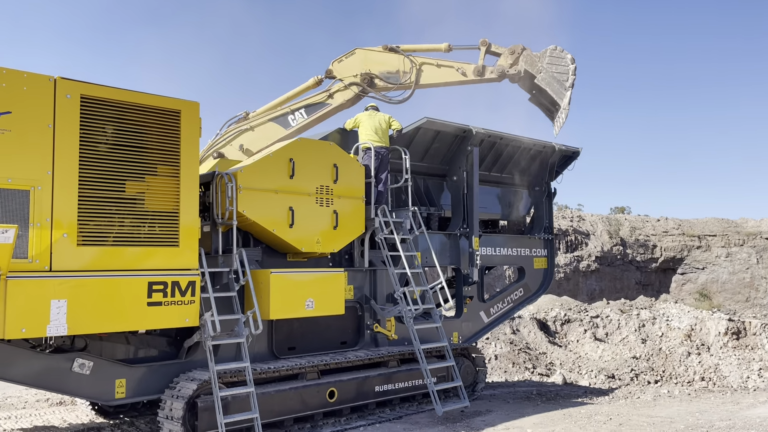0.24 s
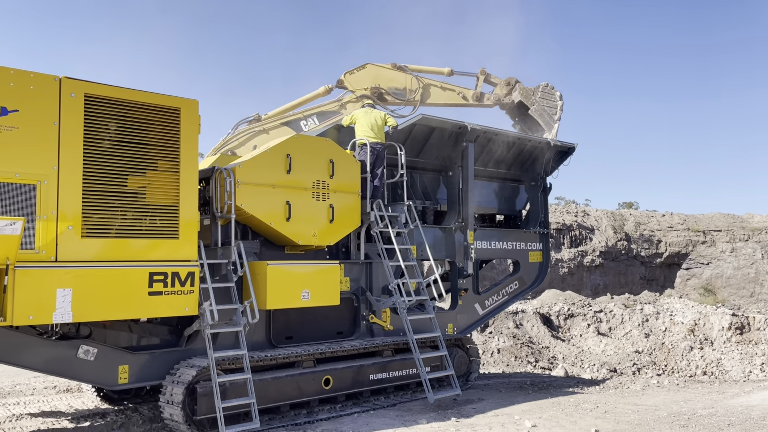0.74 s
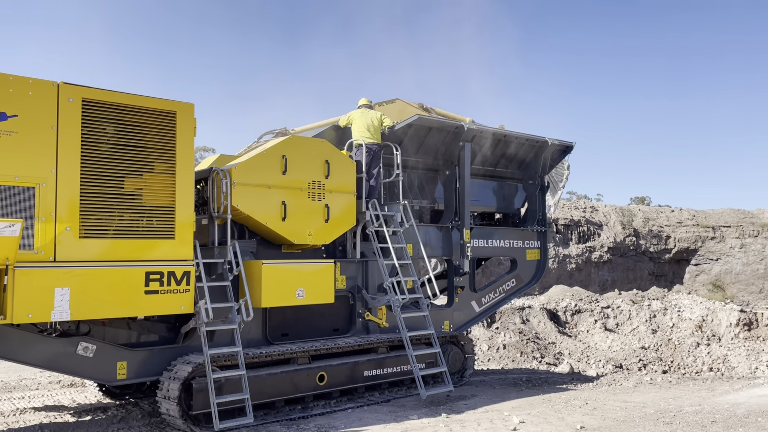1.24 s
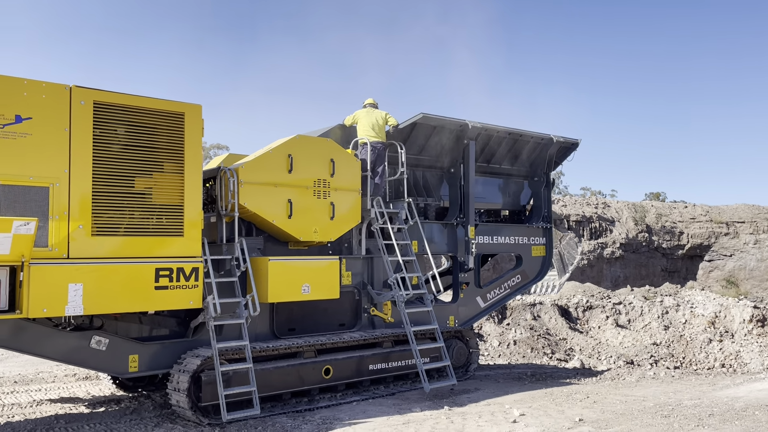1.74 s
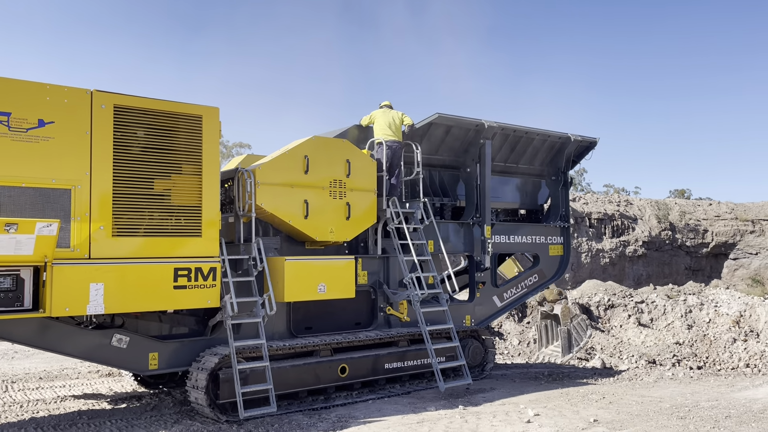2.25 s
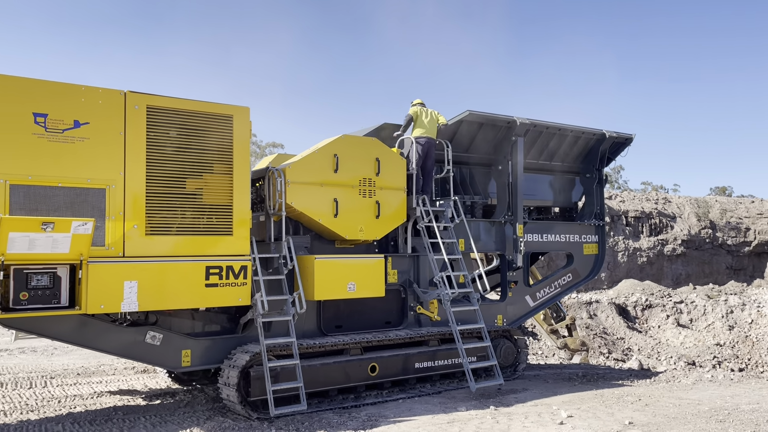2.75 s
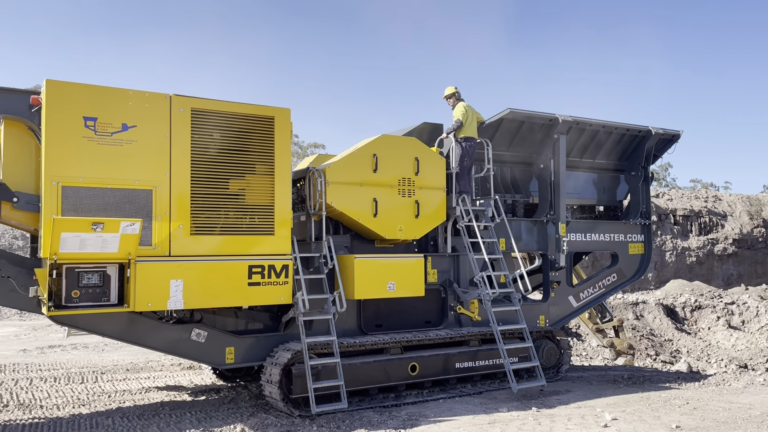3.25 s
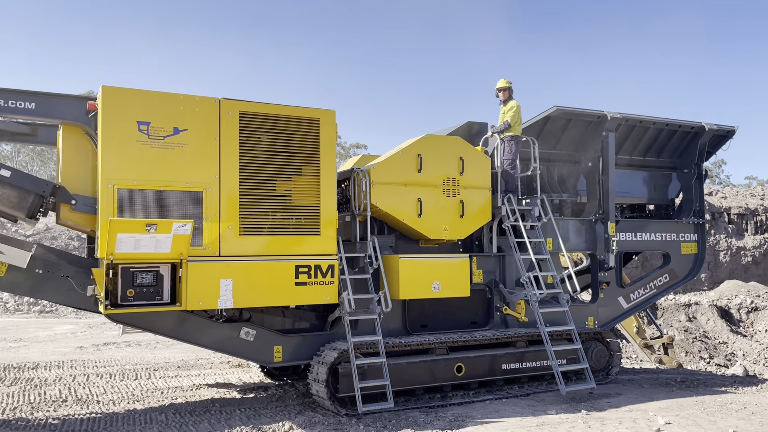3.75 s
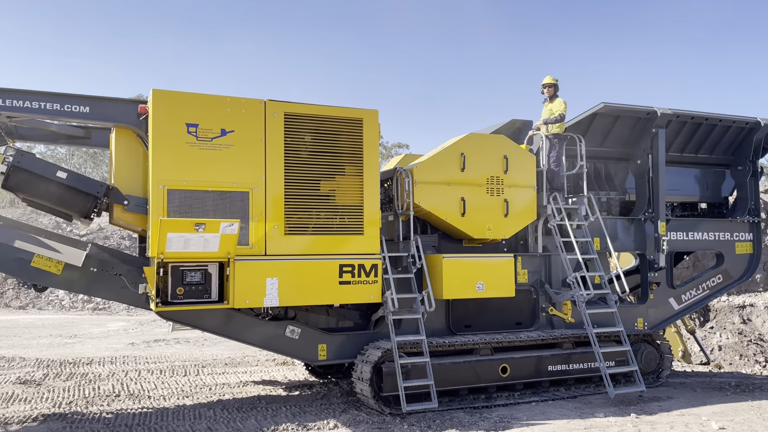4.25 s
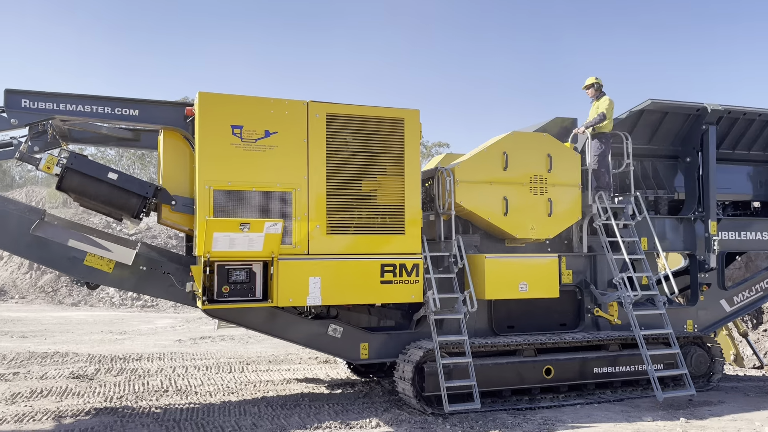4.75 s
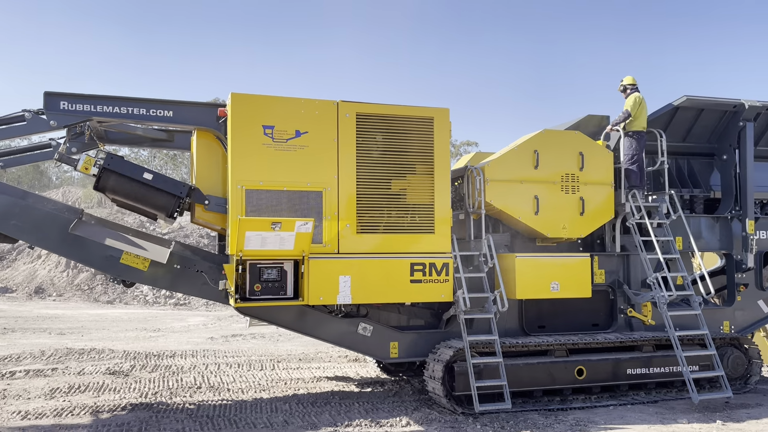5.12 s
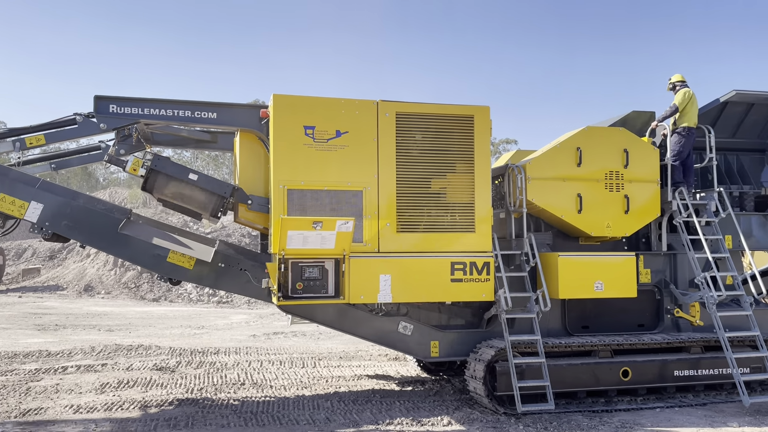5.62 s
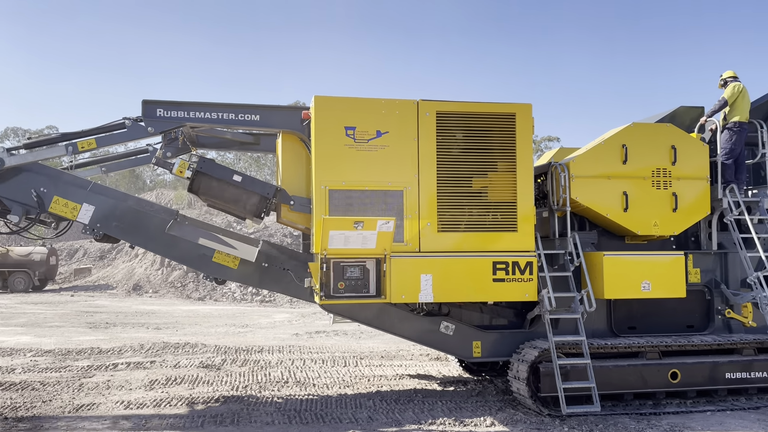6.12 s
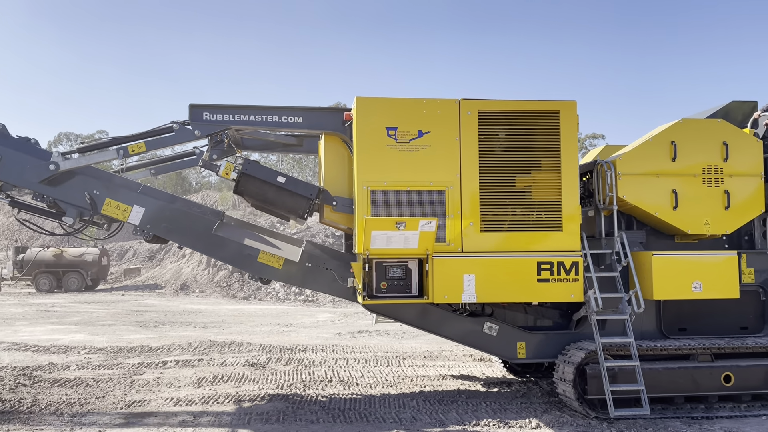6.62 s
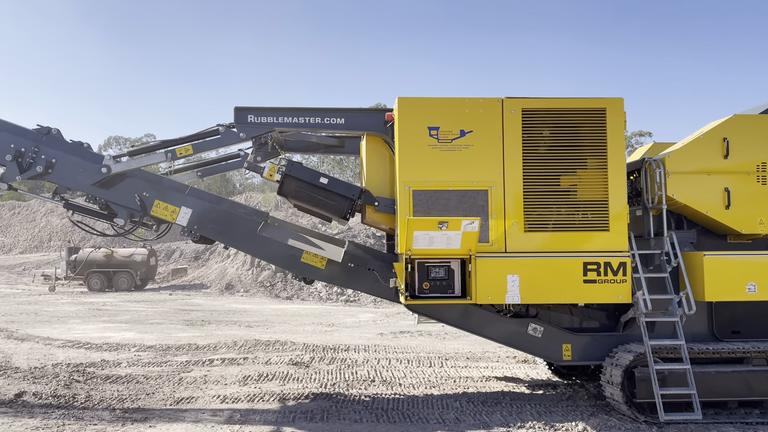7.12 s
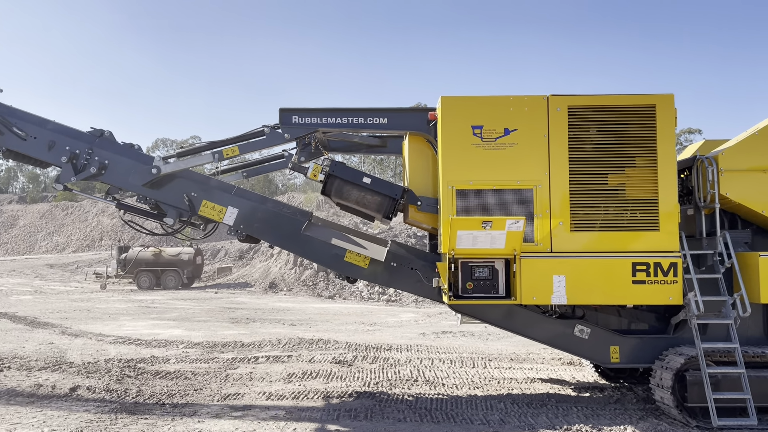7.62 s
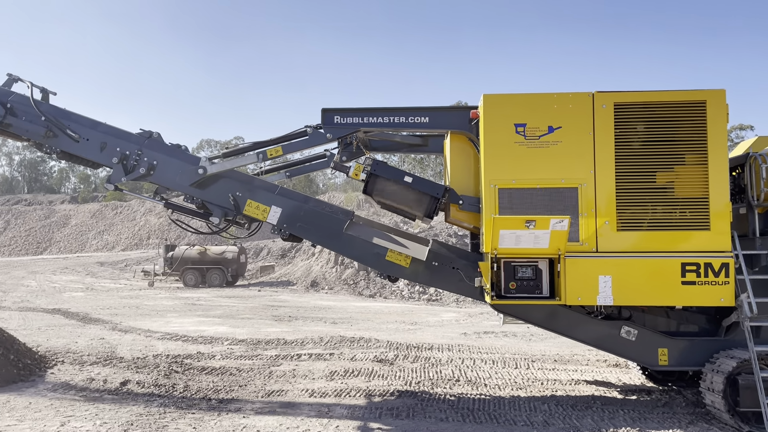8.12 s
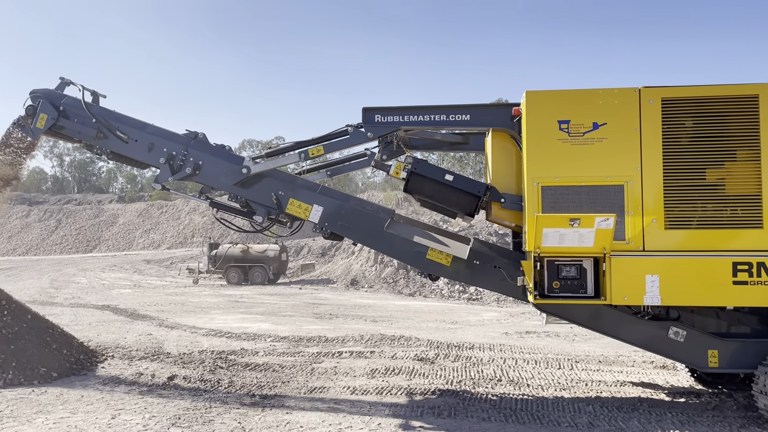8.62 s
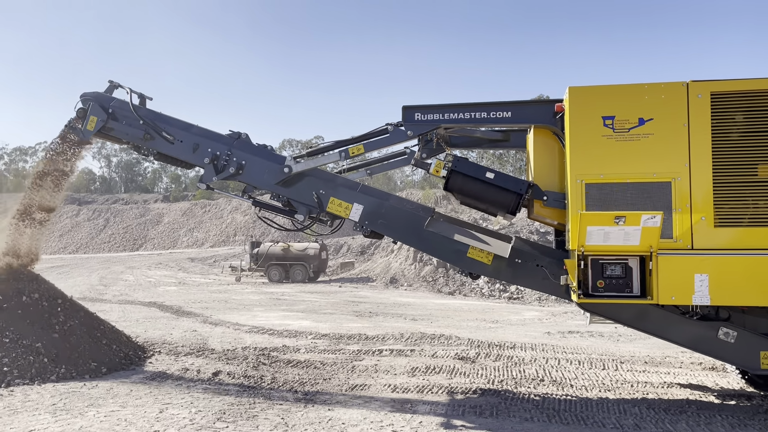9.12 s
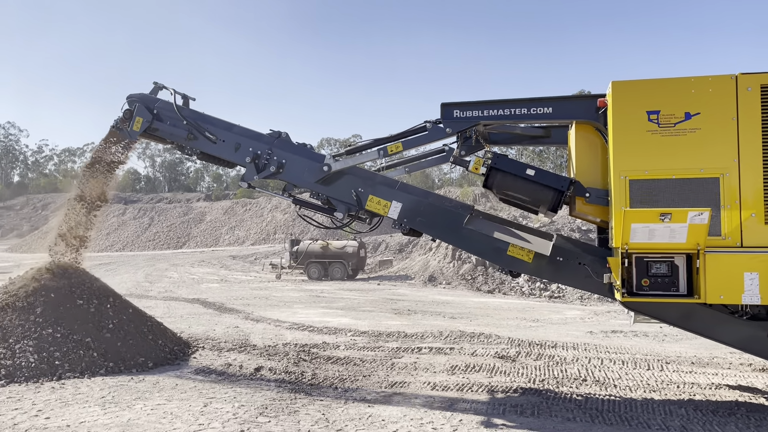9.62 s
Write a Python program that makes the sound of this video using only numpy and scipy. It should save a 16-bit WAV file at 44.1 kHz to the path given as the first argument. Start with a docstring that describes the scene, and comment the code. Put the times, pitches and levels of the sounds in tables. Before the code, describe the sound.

A tracked rock crusher grinds loudly outdoors, engine droning and gears whining while stones clatter through steel and gritty rubble hisses along a conveyor.

```python
"""A tracked jaw crusher works in a quarry, heard from a few metres; its lowest bass fills in over the first seconds.
From the start a six-cylinder diesel drones as pulse harmonics, its fan hums, filtered noise clatters and blows
through louvres, gears whine as tones geared to the engine, modes thump with the jaw, and random impacts make
stone rattle through the chamber and along the belt; cracks ring. Near 1.9 s a dumped bucketful booms as decaying
low noise, and near 3.6 s a stone squeals in bending tones, while the microphone turns from hopper to conveyor."""
import sys
import numpy as np
from scipy import signal
from scipy.fft import rfft, irfft
from scipy.io import wavfile
from scipy.ndimage import uniform_filter1d, map_coordinates

SR = 44100
rng = np.random.default_rng(int(sys.argv[2]) if len(sys.argv) > 2 else 0)


def to_wav(s):
    """Save 16-bit WAV."""
    ch = np.atleast_2d(s).T  # columns
    pcm = np.round(np.clip(ch, -1, 1) * 32767)  # PCM
    wavfile.write(sys.argv[1], SR, pcm.astype(np.int16))


N = 434826
TIME = np.arange(N) / SR  # s

# Swing of the microphone along the machine: t/s, turn (0 hopper, 1 end of the conveyor)
TURN = [(0, 0.079), (1.9, 0.063), (3, 0.12), (3.7, 0.21), (4.3, 0.28), (6, 0.56), (7.1, 0.7), (8.5, 0.88),
        (9.86, 0.99)]
# Engine speed, the governor hunting as the jaw fills, then settling: t/s, f/Hz (four-stroke cycles)
SPEED = [(0, 15.79), (.35, 15.77), (1, 15.84), (1.4, 15.885), (2, 15.79), (2.45, 15.742), (3, 15.845),
         (3.5, 15.893), (4, 15.845), (4.4, 15.795), (5.2, 15.863), (5.75, 15.877), (6.4, 15.818),
         (7.5, 15.83), (8.4, 15.85), (9.86, 15.828)]
NOMINAL_CYCLE_HZ, JAW_HZ, FIRST_BITE_S = 15.83, 4.707, .083
FAN_RATIO = 15.9  # blade passages per engine cycle

# Exhaust drone: multiple of the four-stroke cycle, relative level/dB
EXHAUST = [(6, -1), (9, -15.5), (10, -10), (12, -6), (18, -13), (20, -18.5), (21, -23.5), (24, -18.5),
           (26, -23), (28, -26), (30, -23), (38, -21.5), (39, -27), (40, -20.5)]
# Exhaust overtone that swells with engine speed: level at the slowest, gain at the fastest
HOWL_MULTIPLE, HOWL_DB, HOWL_SURGE_DB = 36, -43, 11

# Fan hum: multiple of the blade rate, level/dB
FAN = [(1, -24), (2, -33), (3, -38.5), (4, -38.5), (5, -44.5), (6, -45), (8, -48)]
OVERTONE_LOSS_DB = 3  # what the fan overtones lose behind the housing
# Noise through the louvres: f/Hz, spectral level/dB per Hz
LOUVRE = [(500, -23), (900, -3.5), (1150, 2.5), (1370, -1.5), (1600, 0), (1900, -2), (2350, -4.5),
          (2800, -8.5), (3400, -14), (5500, -51)]
LOUVRE_TURN, LOUVRE_SPAN = 0.74, 0.52  # the louvres throw their sound in a beam of their own
AIR_DB, BEAM_DB = -31.5, 7.5  # louvre air outside the beam, and its gain inside

# Gear and pump whines: multiples of the engine cycle
WHINE_MULTIPLES = [41.76, 42, 55, 59, 75, 79, 87, 96, 102, 108, 133, 141, 144, 160, 167, 180, 198, 252, 288,
                   320, 324]
# Their levels beside the louvre beam: level/dB
WHINE_ASIDE_DB = [-39, -38, -39.5, -43.5, -47, -47, -48, -52, -53, -52, -58, -49.5, -48, -50.5, -53, -56,
                  -52, -64, -56, -52.5, -52]
# Their levels in the louvre beam: level/dB
WHINE_BEAM_DB = [-38.5, -35.5, -41, -42, -39.5, -46, -47, -45, -47, -40, -45, -51, -55, -52, -51, -47.5,
                 -68, -59, -58, -60, -55]

# Frame modes that swell once with each jaw stroke: f/Hz, relative level/dB
FRAME = [(51.5, -11.5), (72.8, 2.5), (104, -3)]
# How hard the jaw bites: t/s, thump level/dB
BITE = [(0, -24), (2.6, -27), (3.3, -26), (4.7, -25), (5.7, -32), (7, -32), (8.4, -23), (9.86, -26)]
THUMP_SHARPNESS = 3.8  # higher makes each thump shorter
# Heavy rumble under the jaw: f/Hz, spectral level/dB per Hz
RUMBLE = [(20, -33), (35, -25), (50, -4.5), (80, 2), (105, -4.5), (135, -6.5), (230, -5), (290, -6.5),
          (340, -17.5), (600, -38)]

# Stone rattling in the chamber: f/Hz, spectral level/dB per Hz
STONE = [(150, -24), (290, -18), (350, -1.5), (420, -5), (510, 1), (640, 0.5), (740, -5), (860, -1),
         (1020, -2), (1300, -8.5), (1900, -13), (2600, -21.5), (4000, -30.5)]
# Grit on the belt: f/Hz, spectral level/dB per Hz
GRIT = [(1800, -23), (2600, -4.5), (3300, 3), (3900, 5), (4600, 1.5), (5200, 0), (5650, -7), (6500, -3.5),
        (8000, -15)]
# Dust on the belt: f/Hz, spectral level/dB per Hz
DUST = [(3500, -18), (5800, -4), (6500, -1.5), (8000, -3), (9500, .3), (10500, 2.6), (11300, 0),
        (12200, -1), (13000, -4), (14000, -9), (15200, -14.5)]
SCREEN_TURN, SCREEN_SPAN = 0.69, 0.081  # around this turn the housing comes to hide the crushing chamber
STONE_DB, STONE_LOSS_DB = -23.5, 1  # in plain view, and what is lost when hidden
GRIT_DB, GRIT_LOSS_DB = -35.5, 1.5

# Loose stones that knock on the chute, each with its own pitch
KNOCKS_PER_S, KNOCK_LOW_HZ, KNOCK_HIGH_HZ, KNOCK_T60_S = 30, 400, 2200, .04
KNOCK_DB, KNOCK_SPREAD_DB = -26, 3

# Lumps on the conveyor: f/Hz, spectral level/dB per Hz
BELT = [(450, 2.5), (800, -4), (1300, -2.5), (1900, -4), (2600, -7), (4000, -32)]
LUMPS_PER_S, LUMP_RING_S = 70, .007
BELT_DB, BELT_AWAY_DB = -34, 2  # when facing the conveyor end, and the loss at the hopper

# Larger rocks cracking in the jaw: t/s, peak level/dB
CRACKS = [(0.076, -9.5), (1.388, -12.5), (1.986, -15), (2.124, -17), (2.371, -14), (3.301, -18),
          (3.86, -17), (4.808, -15), (8.291, -16)]
# Modes of the steel chamber: f/Hz, relative level/dB, t60/s
CHAMBER = [(410, -4, 0.093), (495, -5, 0.15), (567, -6, 0.13), (694, -1, 0.12), (906, -3, 0.064),
           (1030, -6, 0.047), (1220, -4, .05), (1570, -10, .04), (2530, -14, .03)]

# A bucketful of rock lands and the hopper booms
DUMP_S, DUMP_ATTACK_S, DUMP_DECAY_S, DUMP_DB = 1.87, .06, 0.51, -23
# Its boom: f/Hz, spectral level/dB per Hz
HOPPER = [(50, -28), (72, -6), (88, 2), (103, -12), (150, -17), (220, -36)]

# Short slips of a stone on steel: t/s, length/s, f/Hz, glide/(Hz per s), level/dB
SLIPS = [(3.56, 0.043, 2530, 1400, -34), (3.59, .044, 2590, -1000, -32), (3.622, .056, 2690, -3200, -30.5),
         (3.68, .045, 2560, -200, -37)]
SLIP_EDGE_S = .018  # attack and release
# Modes of the squealing plate: ratio to the slip frequency, relative level/dB
SQUEAL_MODES = [(0.99, 3), (.93, -9), (.68, -7)]

# Phase between the ports at any angle: f/Hz, left lead/rad
PORTS = [(260, -.38), (850, .8), (1300, .9), (2240, .55), (3400, .9), (5250, .8), (5680, -1.1),
         (6800, -1.25), (7600, -2.8), (10000, -4.05), (12900, -6.2)]
# Left minus right at any angle: f/Hz, width/octaves, level/dB
BALANCE_BANDS = [(524, 1, -3), (3250, 0.21, 5), (5940, 0.063, -3), (7330, 0.046, 12.5)]
# Two dips at the right port that slide with the turn:
# turn, lower f/Hz, its strength (1 cancels fully), upper f/Hz, its strength
DIPS = [(.06, 2040, 1.57, 3830, 0.83), (.14, 2350, 1.47, 4130, 1), (.24, 2850, 0.93, 5270, 0.81),
        (.4, 3300, 0.81, 6100, 0.067), (.66, 3700, .25, 6800, .05), (.87, 3650, 0.081, 5300, 0.77),
        (1, 3200, 0.83, 3900, 0.39)]
LOW_DIP_Q, HIGH_DIP_Q = 2.2, 6.1
# Shading of the ports that grows with the turn: f/Hz, width/octaves, left level/dB, right level/dB (full turn)
TURN_SHADE = [(560, 0.36, -4, 0.5), (717, 0.42, -8, -1.8), (1180, 0.33, -10, -2.2),
              (1810, 0.26, -5.5, -0.5), (4350, 0.22, 3.5, -3)]
LAG_HZ, LAG_WIDTH_OCT = 1200, 2.2  # the band in which the turn shifts the lag of the right port
LAG_HOPPER_RAD, LAG_TURN_RAD = 0.32, -1.03  # the lag at the hopper, and its change over the full turn
# Sinking corner of the low shelf that thins the bass at first: t/s, f/Hz
THIN_CORNER = [(0, 220), (.4, 190), (.6, 125), (.9, 101), (1.6, 70), (2, 57), (2.6, 15)]
THIN_DB = -12
TOP_HZ = 15250  # upper limit of the sound


def undb(db):
    """Logarithmic level: decibels to amplitude gain."""
    return 10 ** (np.asarray(db) / 20)


def level(x, db=0):
    """Effective value: set the rms level."""
    return x * undb(db) / np.std(x)


def curves(table, at=TIME):
    """Linear interpolation: join the later columns of a table along its first."""
    s, *columns = np.transpose(table)
    return [np.interp(at, s, c) for c in columns]


def colour(x, spectrum):
    """Linear filtering: shape a spectrum through given points, falling off outside them; rms 1."""
    hz, db = np.transpose(spectrum)
    f = np.arange(N // 2 + 1) * SR / N + 1e-3
    octaves_outside = np.abs(np.log2(f / np.clip(f, hz[0], hz[-1])))
    gain = undb(np.interp(np.log(f), np.log(hz), db) - 20 * octaves_outside)
    return level(irfft(rfft(x) * gain, N))


def walk(rate):
    """Band-limited randomness: smooth wandering through `rate` points per second, spread near 1."""
    return map_coordinates(rng.standard_normal(4096), [TIME * rate], order=3, mode="wrap")


def tones(angle, rows, waver_db, waver_rate, aligned=False):
    """Fourier synthesis: wavering multiples of a shaft's rate; aligned phases add up to sharp pulses."""
    total = 0
    for multiple, db in rows:
        gain = np.sqrt(2) * undb(db + waver_db * walk(waver_rate))
        phase = 0 if aligned else rng.random()
        total = total + gain * np.cos(2 * np.pi * (multiple * angle + phase))
    return total


def impacts(per_second, spread_db):
    """Poisson process: random contacts of either sign, many small and a few large."""
    happens = rng.random(N) < per_second / SR
    sizes = undb(spread_db * np.minimum(rng.exponential(size=N), 4))
    return happens * rng.choice([-1, 1], N) * sizes


def facing(turn, centre, span):
    """Directivity: 1 when the microphone points at a part, falling towards 0 on either side."""
    return np.exp(-((turn - centre) / span) ** 2)


def diesel(crank, surge):
    """Periodic excitation: firing pulses, looser lines from unequal cylinders, a howl that follows speed."""
    firing = [row for row in EXHAUST if row[0] in (6, 12)]  # six firings a cycle, and their octave
    unequal = [row for row in EXHAUST if row not in firing]
    drone = tones(crank, firing, waver_db=0.84, waver_rate=6.8, aligned=True)
    drone = drone + tones(crank, unequal, waver_db=2.04, waver_rate=5)
    howl = tones(crank, [(HOWL_MULTIPLE, HOWL_DB + HOWL_SURGE_DB * surge)], waver_db=2.5, waver_rate=6.6)
    return undb(-18.5) * drone + howl


def clatter(crank, depth, repeat):
    """Cyclic modulation: noise bursts per firing and a knock per cycle, partly alike in every cycle."""
    pattern = rng.standard_normal(round(SR / NOMINAL_CYCLE_HZ))  # one engine cycle long
    alike = map_coordinates(pattern, [crank % 1 * len(pattern)], order=3, mode="wrap")
    repeat = np.clip(repeat, 0, 1)
    firing, cycle = 6 * crank % 1, crank % 1
    burst = 1 + depth * (0.6 * np.exp(-firing / 0.11) + 0.35 * np.exp(-cycle / 0.3))
    noise = np.sqrt(repeat) * alike + np.sqrt(1 - repeat) * rng.standard_normal(N)
    return level(burst * noise)


def cooling(crank, air_db, hidden):
    """Blade-passage tones with fluttering overtones, and surging louvre air with engine clatter."""
    blades = FAN_RATIO * crank + 0.024 * walk(2.515)
    hum = tones(blades, FAN[:1], waver_db=1.5, waver_rate=7.6)
    overtones = tones(blades + .028 * walk(22), FAN[1:], waver_db=3.4, waver_rate=9)
    source = clatter(crank, depth=.45, repeat=.3)
    throb_db = .7 * np.cos(2 * np.pi * 8 * crank) + .5 * walk(8)
    air = colour(source, LOUVRE) * undb(air_db + throb_db + 0.38 * walk(22))
    return hum + overtones * undb(-OVERTONE_LOSS_DB * hidden) + air


def whines(crank, beam):
    """Gear-mesh tones: thin, slightly rough lines whose pitches follow the engine together."""
    rows = []
    for multiple, aside, inside in zip(WHINE_MULTIPLES, WHINE_ASIDE_DB, WHINE_BEAM_DB):
        rows.append((multiple, aside + (inside - aside) * beam))
    return tones(crank + .0003 * walk(30), rows, waver_db=2.8, waver_rate=5)


def jaw(stroke):
    """Forced modal vibration: each stroke thumps the frame, over a rumble that heaves with it."""
    bite_db, = curves(BITE)
    offset = (stroke + .5) % 1 - .5  # strokes from the nearest bite
    ring = sum(undb(db) * np.sin(2 * np.pi * hz * offset / JAW_HZ) for hz, db in FRAME)
    swell = np.abs(np.cos(np.pi * offset)) ** THUMP_SHARPNESS
    thumps = ring * swell * undb(bite_db + 1.4 * walk(5))
    heave_db = 1.44 * np.cos(2 * np.pi * stroke)
    rumble = colour(rng.standard_normal(N), RUMBLE)
    return thumps + rumble * undb(-24.5 + heave_db + 0.44 * walk(34))


def stones(stroke, crank, stone_db, grit_db):
    """Shot noise: bites shed stone into the engine-rattled chamber; grit and dust hiss along the belt."""
    flow = undb(1.6 * np.cos(2 * np.pi * stroke) + 2.6 * walk(15))
    rattle = level(impacts(2000 * flow, spread_db=3.0), -1.9)
    rattle += level(clatter(crank, depth=0.84, repeat=0.33), -1.1)
    grit = level(impacts(4000 * flow, spread_db=4.5), -4.0)
    grit += level(clatter(crank, depth=0.57, repeat=0.29), -0.43)
    dust = level(impacts(9000 * flow, spread_db=1.5), -8.5)
    dust += level(clatter(crank, depth=0.51, repeat=0.14), -1.7)
    chamber = colour(rattle, STONE) * undb(stone_db)
    return chamber + colour(grit, GRIT) * undb(grit_db) + colour(dust, DUST) * undb(-39.0)


def knocks():
    """Damped free vibration: stones hit the chute at random, the larger ones lower and louder."""
    out, t = np.zeros(N + SR), TIME[:SR // 10]
    for when, size, force, overtone in rng.random((int(KNOCKS_PER_S * N / SR), 4)):
        hz = KNOCK_HIGH_HZ * (KNOCK_LOW_HZ / KNOCK_HIGH_HZ) ** size
        ring = np.sin(2 * np.pi * hz * t) + .5 * np.sin(2 * np.pi * hz * (1 + overtone) * t)
        db = KNOCK_DB + KNOCK_SPREAD_DB * (min(-np.log(force), 2) + 2 * (size - 1))
        start = int(when * N)
        out[start:start + len(t)] += undb(db) * ring * np.exp(-np.log(1000) * t / KNOCK_T60_S)
    return out[:N]


def belt(turn):
    """Decaying noise bursts: lumps tumble in uneven batches, clearer as the microphone turns to the conveyor."""
    lumps = np.abs(impacts(LUMPS_PER_S * undb(4 * walk(7)), spread_db=2.5))
    envelope = signal.lfilter([1], [1, -np.exp(-1 / (LUMP_RING_S * SR))], lumps)
    return colour(envelope * rng.standard_normal(N), BELT) * undb(BELT_DB - BELT_AWAY_DB * (1 - turn))


def cracks():
    """Impulsive modal excitation: a rock snaps and rings the chamber, each time at another spot."""
    out, t = np.zeros(N + SR), TIME[:SR // 4]
    hz, db, t60 = np.transpose(CHAMBER)[:, :, None]
    for s, peak_db in CRACKS:
        spot, detune = rng.standard_normal((2, len(CHAMBER), 1))
        decay = np.exp(-np.log(1000) * t / t60)
        modes = spot * undb(db) * decay * np.sin(2 * np.pi * hz * (1 + 0.028 * detune) * t)
        snap = uniform_filter1d(rng.standard_normal(len(t)), size=3) * np.exp(-t / .004)
        hit = np.sum(modes, axis=0) + 0.37 * snap
        start = max(int(s * SR), 0)
        out[start:start + len(t)] += hit / np.abs(hit).max() * undb(peak_db)
    return out[:N]


def dump():
    """Cavity resonance: rock slides into the hopper, whose low noise booms and decays exponentially."""
    t = np.maximum(TIME - DUMP_S, 0)
    envelope = np.minimum(t / DUMP_ATTACK_S, 1) * np.exp(-t / DUMP_DECAY_S)
    return colour(rng.standard_normal(N), HOPPER) * envelope * undb(DUMP_DB)


def squeal():
    """Stick-slip friction of a stone on a steel plate: each slip is a rough, bending tone with fainter modes."""
    out, rough = 0, 0.06 * walk(120)
    for s, length, hz, glide, db in SLIPS:
        t = TIME - s
        envelope = np.clip(np.minimum(t, length - t) / SLIP_EDGE_S, 0, 1)
        angle = hz * t + glide * t ** 2 / 2 + rough
        modes = sum(undb(db + mode_db) * np.sin(2 * np.pi * ratio * angle) for ratio, mode_db in SQUEAL_MODES)
        out = out + np.sqrt(2) * envelope * modes
    return out


def quarry(x, t60, wet_db):
    """Diffuse scattering: rock faces add a faint wash, different on each side; the bass stays mostly direct."""
    t = TIME[:SR // 2]
    tail = rng.standard_normal((2, len(t))) * np.exp(-np.log(1000) * t / t60) * (t > .012)
    tail /= np.sqrt(np.sum(tail ** 2, axis=1, keepdims=True))
    upper = signal.sosfilt(signal.butter(1, 700, "high", fs=SR, output="sos"), x)
    return x + undb(wet_db) * signal.fftconvolve(upper[None], tail, axes=1)[:, :N]


def scene():
    """Superposition: the machine in the open pit, its parts weighted by the turn of the microphone."""
    turn, = curves(TURN)
    speed, = curves(SPEED)
    surge = (speed - speed.min()) / np.ptp(speed)
    hidden = (1 + np.tanh((turn - SCREEN_TURN) / SCREEN_SPAN)) / 2
    stone_db = STONE_DB - STONE_LOSS_DB * hidden
    grit_db = GRIT_DB - GRIT_LOSS_DB * hidden
    beam = facing(turn, LOUVRE_TURN, LOUVRE_SPAN)
    crank = np.cumsum(speed) / SR + .0006 * walk(5)  # engine cycles
    stroke = JAW_HZ * (TIME - FIRST_BITE_S) + 0.0049 * walk(4.7)  # jaw cycles
    drive = diesel(crank, surge) + cooling(crank, AIR_DB + BEAM_DB * beam, hidden) + whines(crank, beam)
    crushing = jaw(stroke) + stones(stroke, crank, stone_db, grit_db) + knocks() + belt(turn)
    crushing = crushing + cracks() + dump() + squeal()
    return quarry(drive + crushing, t60=.35, wet_db=-9.5)


def record(dry):
    """Diffraction: two microphone ports, shaded and delayed differently by their housing as it turns."""
    f, t, spec = signal.stft(dry, SR, nperseg=2048)
    f = f[:, None] + 1  # keeps the logarithms finite
    turn, = curves(TURN, t)

    def band(hz, octaves):
        """Gaussian weighting: a bell on the logarithmic frequency axis."""
        return np.exp(-(np.log2(f / hz) / octaves) ** 2)

    def dip(hz, strength, q):
        """Interference: sound bent round the housing cancels direct sound near one frequency."""
        return 1 - strength / (1 + 1j * q * (f / hz - hz / f))

    pan_db = sum(db * band(hz, width) for hz, width, db in BALANCE_BANDS)
    left_db = pan_db / 2 + turn * sum(db * band(hz, width) for hz, width, db, _ in TURN_SHADE)
    right_db = -pan_db / 2 + turn * sum(db * band(hz, width) for hz, width, _, db in TURN_SHADE)
    low_hz, low, high_hz, high = curves(DIPS, turn)
    dips = dip(low_hz, low, LOW_DIP_Q) * dip(high_hz, high, HIGH_DIP_Q)
    turn_lag = (LAG_HOPPER_RAD + LAG_TURN_RAD * turn) * band(LAG_HZ, LAG_WIDTH_OCT)
    lead = np.interp(f, *np.transpose(PORTS)) + turn_lag
    ports = np.array([undb(left_db), undb(right_db) * dips * np.exp(-1j * lead)])
    corner_hz, = curves(THIN_CORNER, t)
    shelf = undb(THIN_DB / (1 + (f / corner_hz) ** 8))
    heard = signal.istft(spec * ports * shelf, SR)[1][:, :N]
    return signal.sosfilt(signal.ellip(10, .2, 80, TOP_HZ, fs=SR, output="sos"), heard)


dry = scene()
out = record(dry)
to_wav(out)
```